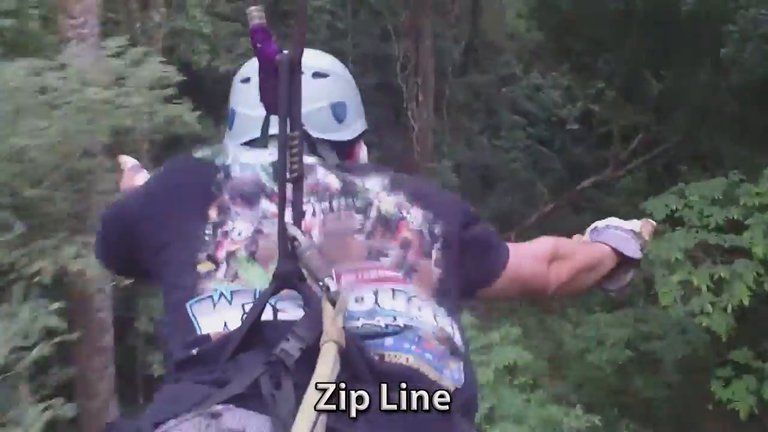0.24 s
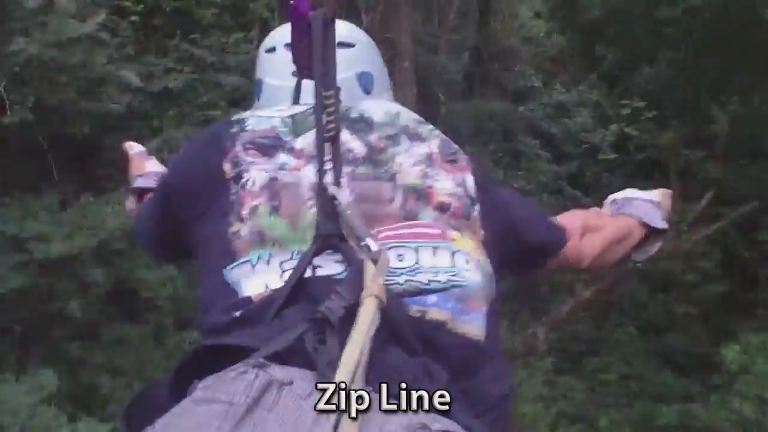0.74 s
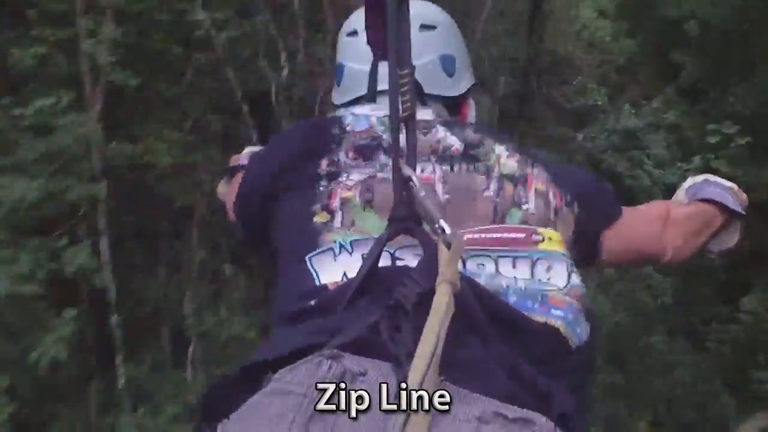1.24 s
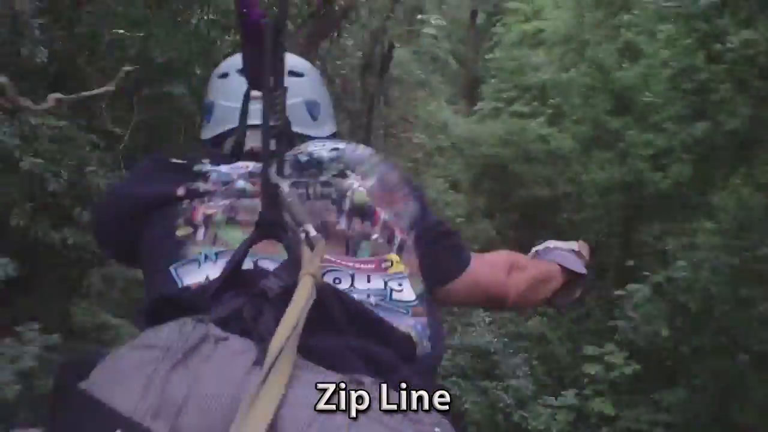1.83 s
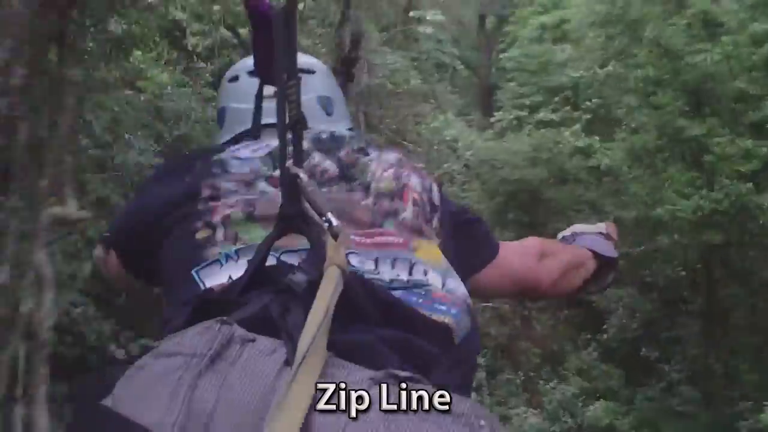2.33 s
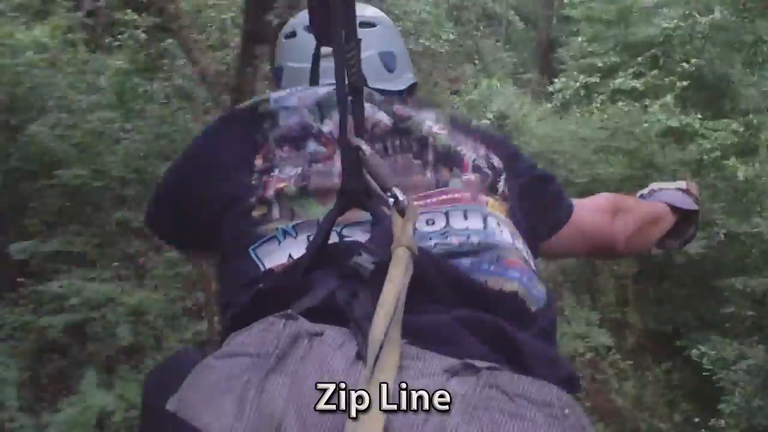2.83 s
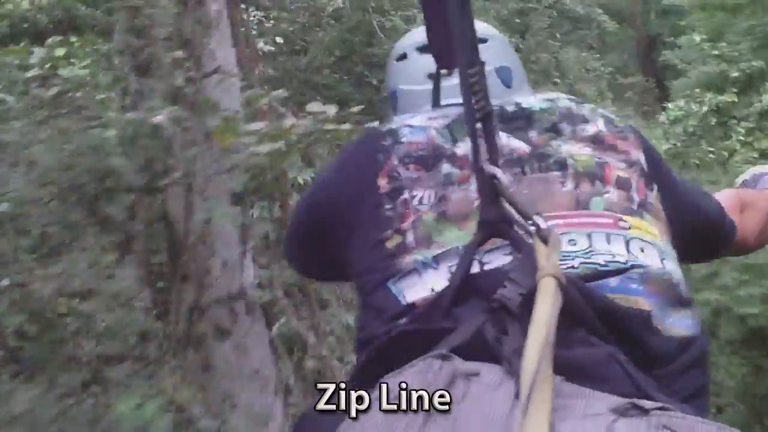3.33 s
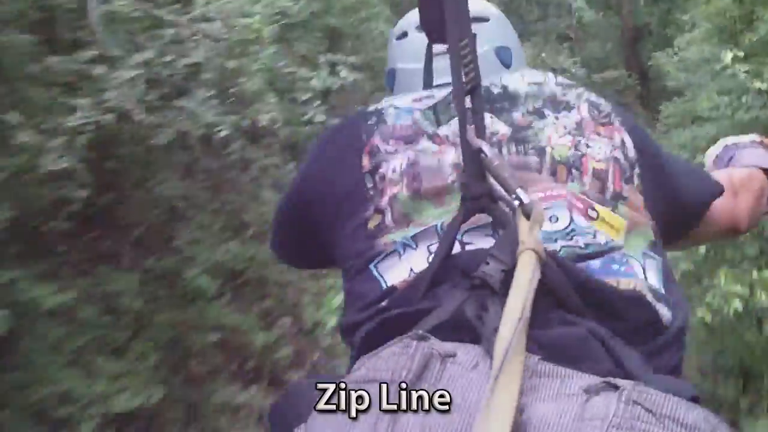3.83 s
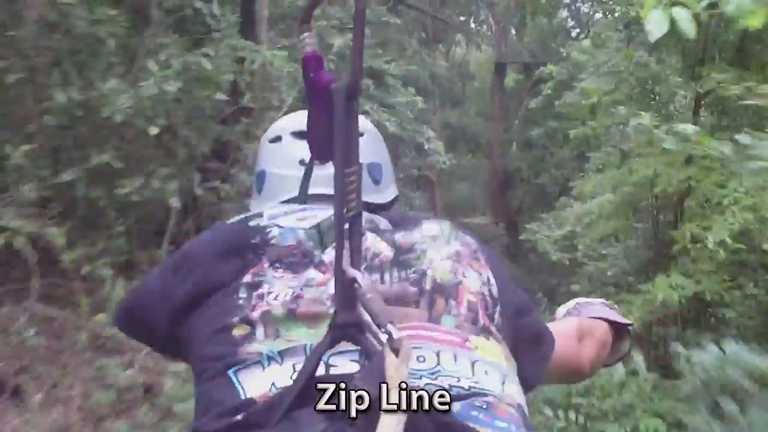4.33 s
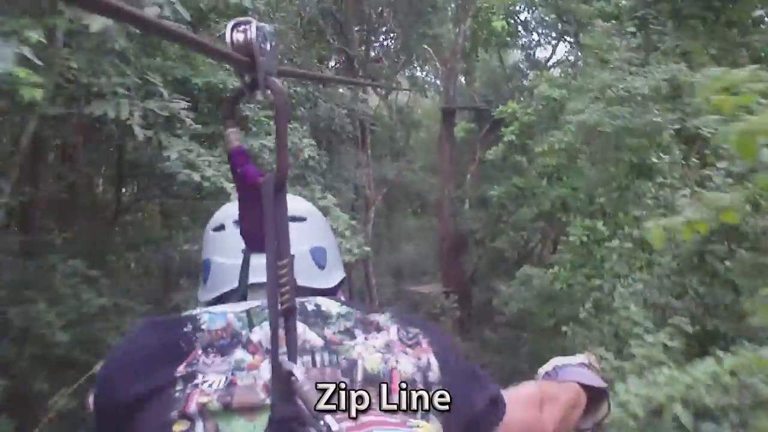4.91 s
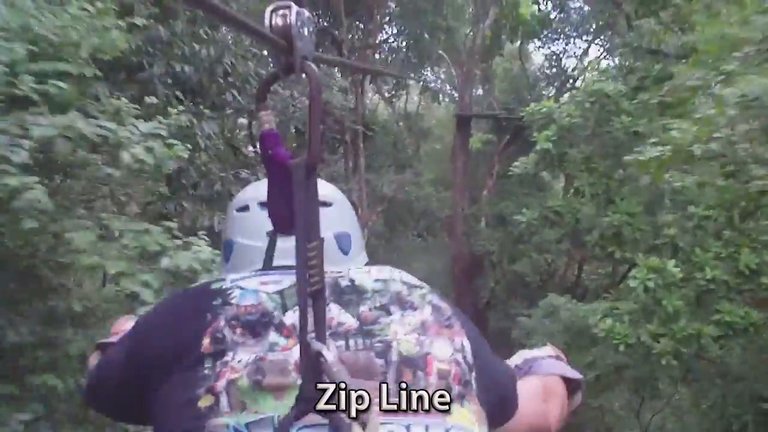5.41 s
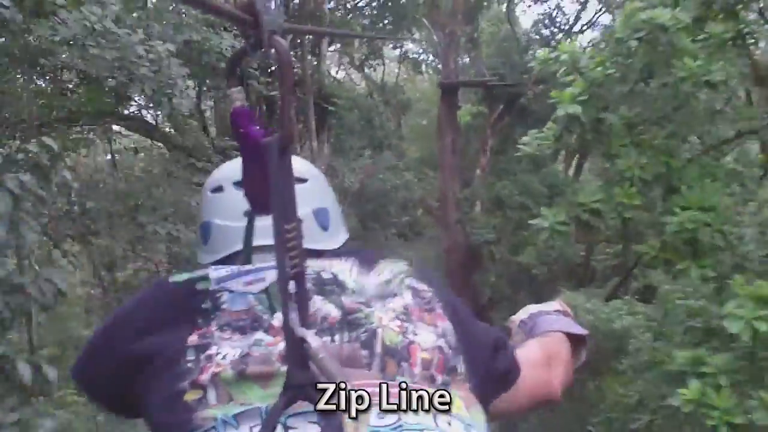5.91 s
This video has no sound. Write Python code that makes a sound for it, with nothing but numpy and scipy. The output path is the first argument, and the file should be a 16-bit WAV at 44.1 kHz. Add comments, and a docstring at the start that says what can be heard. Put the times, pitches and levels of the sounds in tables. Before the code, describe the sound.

Already in motion, a pulley rolls over a stranded steel cable with a high, wavering whine and a gritty, hissing metallic roar. The pitch holds briefly, then sinks smoothly by more than half an octave. Small surges and dips shake the sound, while low wind rushes over the single microphone carried behind the rider. There is no final stop, only steady rolling among trees.

```python
"""A whine with overtones falls in pitch over rough rolling noise and a rush of wind, with a faint hum early on.
A pulley trolley rolls down a six-strand steel cable and slows: every strand passing under the wheel gives
a push, and the pushes make the whine. Contact noise rings the cable span, hanger, side plates, rim and hub.
Wind is shaped noise streaming over a single microphone carried behind the rider; both channels are the same."""
import sys
import numpy as np
from scipy import signal
from scipy.fft import rfft, irfft, next_fast_len
from scipy.io import wavfile
from scipy.ndimage import uniform_filter1d, map_coordinates

SR = 44100
rng = np.random.default_rng(int(sys.argv[2]) if len(sys.argv) > 2 else 0)


def dump_mix(stems):
    """Bounce the given channels to the path in sys.argv[1] as a 16-bit WAV at rate SR."""
    frames = np.atleast_2d(stems).T  # one column per channel
    limited = np.clip(frames, -1, 1)  # hard clip at full scale
    pcm = np.round(limited * 32767).astype(np.int16)
    wavfile.write(sys.argv[1], SR, pcm)


N = 271656

# The slowing trolley: t/s, mean rate of strands passing under the wheel f/Hz
STRAND_RATE = [(0, 1165), (.15, 1165), (.26, 1183), (.52, 1135), (.65, 1155), (1, 1133), (1.5, 1121),
               (2, 1089), (2.75, 1049), (3.5, 991.8), (4, 941), (4.5, 907.4), (5, 859.3), (5.5, 831.6),
               (5.84, 803.3), (5.89, 782), (6.16, 763)]


def amp(db):
    """Gain of a level in dB."""
    return 10 ** (np.asarray(db) / 20)


def unit(x):
    """x at rms 1."""
    return x / np.sqrt(np.mean(x ** 2) + 1e-20)


def along(points, hz):
    """Interpolate (f/Hz, value) points on a log frequency axis."""
    f, value = np.transpose(points)
    return np.interp(np.log(hz + 1), np.log(f + 1), value)


def curves(rows):
    """One value per sample for each column after the time."""
    t, *columns = np.transpose(rows)
    return [np.interp(np.arange(N) / SR, t, column) for column in columns]


def wobble(rate):
    """A smooth random curve through normally distributed knots, rate knots a second."""
    knots = rng.standard_normal(int(N * rate / SR) + 4)
    return map_coordinates(knots, [np.arange(N) * rate / SR])


def filtered(x, response):
    """x shaped by a response over frequency, with spare length for the ringing."""
    m = next_fast_len(N + SR // 2)
    hz = np.fft.rfftfreq(m, 1 / SR)
    return irfft(rfft(x, m) * response(hz), m)[..., :N]


def resonances(modes):
    """Response of a few broad modes, alternating in sign from one to the next."""
    def response(f):
        total = 0
        for k, (centre, width, db) in enumerate(modes):
            damping = 1j * f * width
            total = total + (-1) ** k * amp(db) * damping / (centre ** 2 - f ** 2 + damping)
        return total
    return response


def patchy(depth_db, streak_db):
    """White noise with broad patches of random gain and streaks narrow in pitch but longer in time."""
    z = signal.stft(rng.standard_normal(N + SR), nperseg=512)[2]

    def field(bins, hops):
        across_pitch = uniform_filter1d(rng.standard_normal(z.shape), size=bins, axis=0)
        return unit(uniform_filter1d(across_pitch, size=hops, axis=1))

    gain = amp(depth_db * field(bins=8, hops=6) + streak_db * field(bins=2, hops=16))
    return signal.istft(z * gain, nperseg=512)[1][:N]


def wind(flutter_db):
    """Air streams over the microphone in lumps; the shaking rig stirs it."""
    # Level of the wind, with brief sharp dips: t/s, level/dB
    wind_level = [(0.0, -38), (2.45, -35), (2.5, -43.5), (2.56, -35), (3.09, -33.5), (3.19, -39.5),
                  (3.33, -32), (3.5, -41), (3.53, -35.5), (3.59, -37.5), (4.43, -34.5), (5.75, -38.5),
                  (5.82, -37.5), (6.16, -36)]
    # Spectrum of the rushing air: f/Hz, relative level per Hz/dB
    air_colour = [(20, -19), (80, -2), (160, -2), (300, -1), (600, -11), (1200, -22), (3000, -42.5)]
    lumps = amp(0.5 * wobble(9) + 0.71 * wobble(22) + 3.0 * wobble(45) + .6 * flutter_db)
    rush = filtered(patchy(depth_db=0.1, streak_db=-1.3), lambda hz: amp(along(air_colour, hz)))
    return amp(curves(wind_level)[0]) * unit(lumps * rush)


def hum():
    """A sine oscillator with wavering pitch and level, faint under the whine and soon fading."""
    # Path of the hum: t/s, f/Hz, level/dB
    hum_path = [(0, 740, -34), (.15, 740, -39), (.4, 738, -36.5), (.9, 751, -43), (1.5, 751, -71)]
    hz, db = curves(hum_path)
    phase = 2 * np.pi * np.cumsum(hz + 5 * wobble(30)) / SR
    return np.sqrt(2) * amp(db + 2 * wobble(37)) * np.sin(phase)


def strand_phase():
    """Phase of the strand passing; uneven lay and the bouncing load make it waver."""
    rate_hz = curves(STRAND_RATE)[0]
    waver_hz = 2.5 * wobble(10) + 2.795 * wobble(25) + 4 * wobble(90)
    return 2 * np.pi * np.cumsum(rate_hz + waver_hz) / SR


def wheel_pressure(phase):
    """Wheel pressure on the cable in dB: it flutters, and swings about once a turn as the wheel runs out of true."""
    # Pressure, heard as the loudness of the roll: t/s, level/dB
    pressure_path = [(0.0, -17.5), (0.03, -14.5), (0.07, -18), (0.26, -18.5), (0.65, -18), (0.74, -16),
                     (1.03, -15.5), (1.06, -14), (1.1, -17), (1.59, -15), (1.61, -19), (1.66, -12.5),
                     (1.7, -20.5), (1.77, -17.5), (1.85, -20.5), (1.9, -16.5), (2.21, -20), (2.57, -17),
                     (2.59, -28), (2.66, -16.5), (3.69, -17.5), (3.71, -11.5), (3.74, -18.5), (3.91, -16.5),
                     (4.58, -16.5), (6.16, -15.5)]
    strands_per_turn, runout_depth_db = 76, 0.96
    runout_db = runout_depth_db * np.sin(phase / strands_per_turn + 2.3 * wobble(2.46))
    jitter_db = .5 * wobble(11) + 0.71 * wobble(26) + 1.14 * wobble(50)
    return curves(pressure_path)[0] + runout_db + jitter_db


def rolling(phase, pressure_db):
    """Rough contact noise, pulsing with each strand and each twist of the cable, rings the trolley and cable."""
    # Broad modes of each ringing part: f/Hz, width/Hz, relative level/dB
    cable_span = [(434, 430, -0.5), (830, 516, 0.5)]
    hanger = [(951, 365, -2), (1345, 545, 1), (2013, 340, 2.5), (2640, 450, -2)]
    side_plates = [(2950, 440, 2), (3330, 850, 0.5)]
    wheel_rim = [(4836, 670, 12), (6130, 1800, -5.5)]
    wheel_hub = [(5930, 870, 3), (6680, 515, 3.5)]
    # How strongly parts ring, re pressure: t/s, cable span/dB, side plates/dB, rim/dB, hub/dB
    part_balance = [(0, -9.5, -3, -12, -8.5), (.7, -9.5, -6, -12.5, -10), (1.45, -10.5, -8.5, -14, -13),
                    (1.75, -9, -7, -12, -13), (2, -9.5, -6, -7.5, -4.5), (2.45, -11.5, -6, -7.5, -9.5),
                    (2.7, -10, -10, -8, -7.5), (3.3, -11.5, -6, -12, -5.5), (3.9, -14.5, -8.5, -14, -7.5),
                    (4.4, -11.5, -7.5, -12, -7), (4.95, -16, -8, -8, -8.5), (5.4, -16.5, -9, -9.5, -6),
                    (5.9, -16, -6, -7, -6.5), (6.16, -14.5, -10, -12.5, -8.5)]
    strands, hanger_db = 6, -6.5  # strands per twist; hanger level re pressure
    grit_db, drift_db = 1, 0.46  # depth of the quick contact grain and of each part's own slow drift

    strand_pulse = 1 + .36 * np.cos(phase)
    twist_pulse = 1 + .14 * np.cos(phase / strands)
    pulsing = strand_pulse * twist_pulse * amp(grit_db * wobble(600))
    span_db, plates_db, rim_db, hub_db = curves(part_balance)
    parts = [(cable_span, span_db), (hanger, hanger_db), (side_plates, plates_db),
             (wheel_rim, rim_db), (wheel_hub, hub_db)]
    sound = np.zeros(N)
    for modes, share_db in parts:
        # random patches and streaks make the rolling noise uneven in pitch and time
        contact = pulsing * patchy(depth_db=1.5, streak_db=0.5)
        ringing = unit(filtered(contact, resonances(modes)))
        sound += amp(pressure_db + share_db + drift_db * wobble(5.03)) * ringing
    return sound


def trolley_gain(hz):
    """Gain of the trolley's narrow resonances at a frequency, summed as power."""
    # Narrow resonances that swell a partial sliding through: f/Hz, width/Hz, peak level/dB
    narrow_modes = [(812, 55, -6), (882, 160, -9.5), (1001, 200, -6), (1175, 166, 0.5), (1547, 44, -4),
                    (1658, 39, -10), (1882, 89, -1), (1983, 110, -1), (2098, 180, -5.5), (2359, 71, -3),
                    (2566, 300, 1.5), (3218, 140, 5.5), (3310, 35, 11.5), (3413, 260, 5.5),
                    (3696, 160, 9.5), (4440, 330, -6.5), (4690, 180, -1.5), (5617, 220, -1), (6196, 120, 3),
                    (6470, 400, -2)]
    power = 0
    for centre, width, db in narrow_modes:
        power = power + (amp(db) / (1 + (2 * (hz - centre) / width) ** 2)) ** 2
    return np.sqrt(power)


def whine(phase, flutter_db):
    """Partials of the strand rate swell across resonances; each fades as cable waves return to the wheel."""
    # Partials 1 to 8 before the resonances: level/dB
    partial_levels = [-22, -19.5, -30, -37.5, -29, -31.5, -26.5, -38]
    rate_hz = curves(STRAND_RATE)[0]
    tone = np.zeros(N)
    for order, db in enumerate(partial_levels, start=1):
        fading_db = (0.45 + 0.39 * order) * wobble(70) + 2.0 * wobble(24) + 0.16 * order * wobble(12)
        # higher partials lose their phase sooner
        blur = .03 * order ** 2 * wobble(110)
        level = amp(db + fading_db + 1.04 * flutter_db) * trolley_gain(order * rate_hz)
        start_phase = rng.uniform(0, 2 * np.pi)
        tone += np.sqrt(2) * level * np.sin(order * phase + blur + start_phase)
    return tone


def scene():
    """Mix the layers; quick flutter of the wheel pressure shakes whine, roll and wind."""
    phase = strand_phase()
    pressure_db = wheel_pressure(phase)
    steady_db = uniform_filter1d(pressure_db, size=SR // 6)
    flutter_db = pressure_db - steady_db
    # the contact noise follows the quick swings less than the tone does
    roll = rolling(phase, steady_db + 0.81 * flutter_db)
    mono = wind(flutter_db) + hum() + roll + whine(phase, flutter_db)
    return np.array([mono, mono])


def record(dry):
    """The microphone's colour, then nothing from the band limit up."""
    # Microphone response: f/Hz, level/dB
    mic_colour = [(30, -0.5), (6600, -1), (6900, -0.5), (7100, 2), (7250, -17.5), (7400, -27),
                  (7550, -44.5)]
    top_hz = 7600
    return filtered(dry, lambda hz: amp(along(mic_colour, hz)) * (hz < top_hz))


dry = scene()
out = record(dry)
dump_mix(out)
```